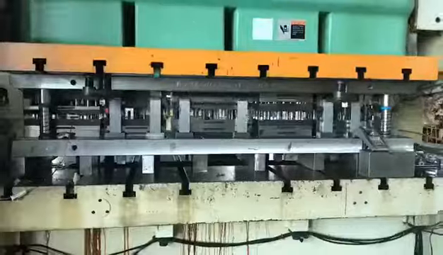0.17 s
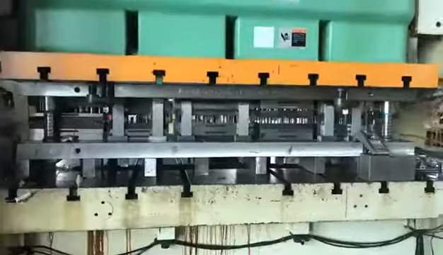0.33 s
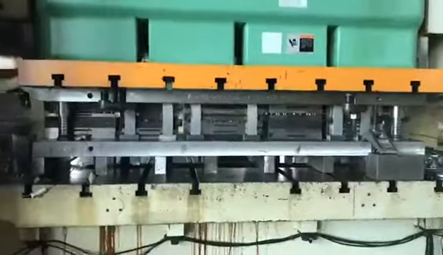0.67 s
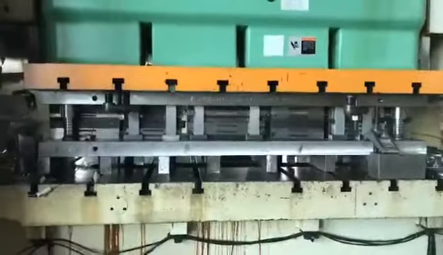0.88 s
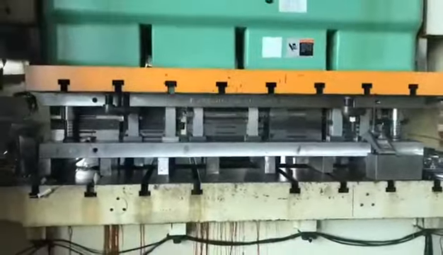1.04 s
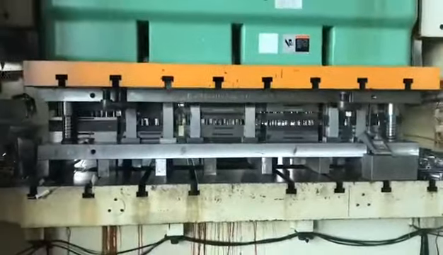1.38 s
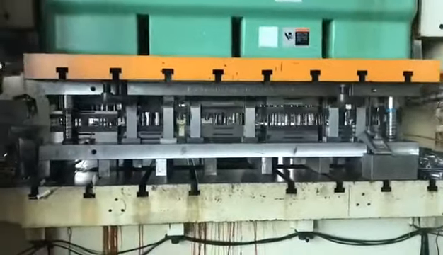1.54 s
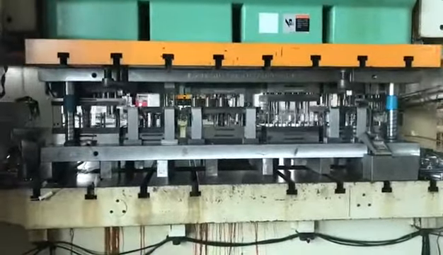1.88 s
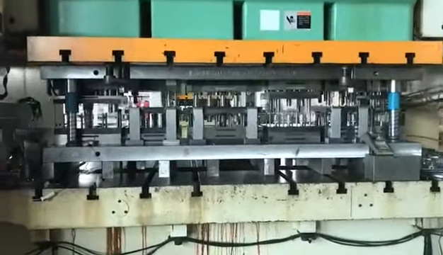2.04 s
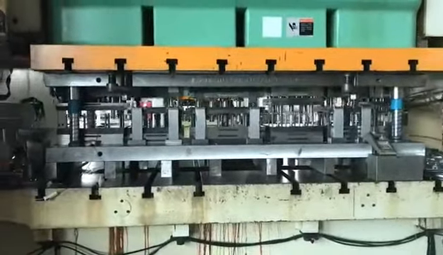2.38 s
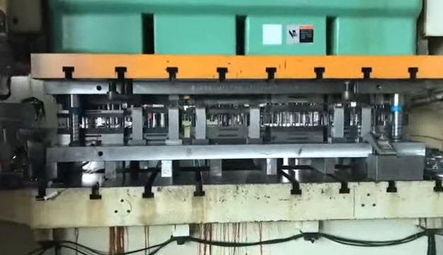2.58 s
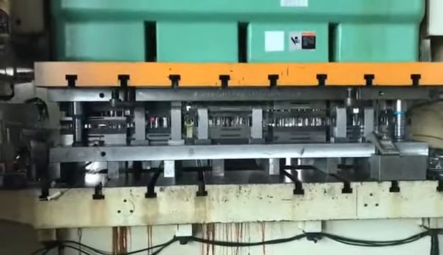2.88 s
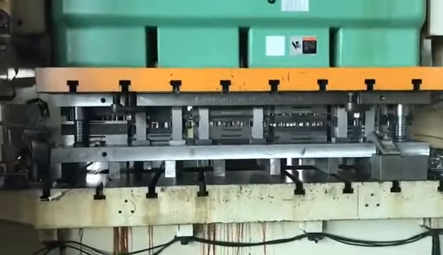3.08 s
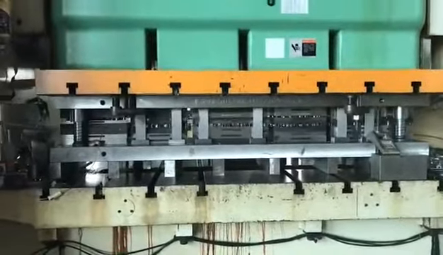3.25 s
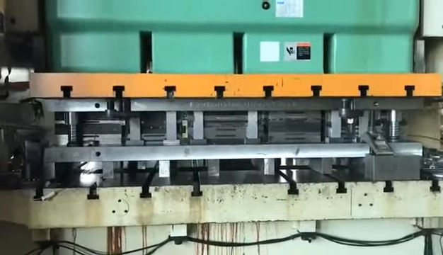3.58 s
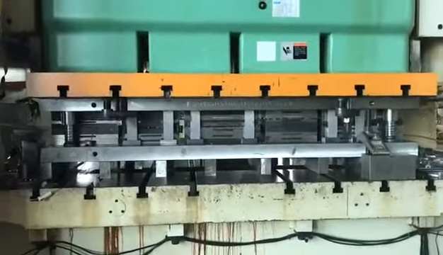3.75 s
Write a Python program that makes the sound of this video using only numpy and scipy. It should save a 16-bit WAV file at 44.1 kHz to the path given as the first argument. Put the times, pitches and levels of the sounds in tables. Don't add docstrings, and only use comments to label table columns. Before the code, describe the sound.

Large stamping press thumps heavily in a factory, with metallic clanks and short air hisses

```python
import sys
import numpy as np
from scipy import signal
from scipy.io import wavfile
from scipy.ndimage import uniform_filter1d

SR = 44100
rng = np.random.default_rng(int(sys.argv[2]) if len(sys.argv) > 2 else 0)


def put_to_file(sound):
    columns = np.atleast_2d(sound).T
    safe = np.clip(columns, -1, 1)
    whole_steps = np.round(safe * 32767)
    wavfile.write(sys.argv[1], SR, whole_steps.astype(np.int16))


def voltage_ratio(decibels):
    exponent = np.asarray(decibels, float) / 20
    return 10 ** exponent


N = 172872
T = np.arange(N) / SR
CYCLE_S = 2.682


def evened(x):
    return x / np.sqrt(np.mean(x ** 2) + 1e-20)


def curve(rows):
    return np.interp(T, *np.transpose(rows))


def wobble(size):
    return evened(uniform_filter1d(uniform_filter1d(rng.standard_normal(N), size), size))


def gate(start, hold, rise_s, t60):
    rise = np.clip((T - start) / rise_s, 0, 1)
    return rise * voltage_ratio(-60 * np.maximum(T - start - hold, 0) / t60)


def add(mix, s, sound):
    part = mix[round(s * SR):][:len(sound)]
    part += sound[:len(part)]


def resonate(x, hz, width_hz):
    turn = np.exp(2j * np.pi * np.cumsum(hz * np.ones(len(x))) / SR)
    r = np.exp(-np.pi * width_hz / SR)
    return 2 * (turn * signal.lfilter([1 - r], [1, -r], x / turn)).real


def bands(modes, wander):
    total = np.zeros(N)
    for hz, width_hz, db in modes:
        centre = hz * (1 + wander * wobble(size=6000))
        narrow = resonate(rng.standard_normal(N), centre, width_hz)
        total += voltage_ratio(db) * evened(resonate(narrow, centre, 3.76 * width_hz))
    return evened(total)


def noise(spectrum, patchy_db, flicker_db):
    frames, hz = N // 256 + 5, np.fft.rfftfreq(1024, 1 / SR)
    a, b, patches = rng.standard_normal((frames, 513, 3)).T
    patches = evened(uniform_filter1d(uniform_filter1d(patches, size=8, axis=0), size=10, axis=1))
    flicker = evened(uniform_filter1d(rng.standard_normal(frames), size=6))
    f, level = np.transpose(spectrum)
    shape = np.interp(np.log(np.minimum(hz, 7400) + 1), np.log(f), level, left=-60)[:, None]
    z = (a + 1j * b) * voltage_ratio(shape + patchy_db * patches + flicker_db * flicker)
    return evened(signal.istft(z, nperseg=1024, noverlap=768)[1][:N])


def ring(modes, rise_s):
    t = np.arange(SR // 2) / SR
    decay = sum(voltage_ratio(db - 60 * t / t60) * np.sin(2 * np.pi * hz * t) for hz, db, t60 in modes)
    return (1 - np.exp(-t / rise_s)) * decay


def crushed_ring(modes, crush_s, rise_s, first, splash_db, splash_hz):
    t = np.arange(1500) / SR
    crunch = rng.standard_normal(1500) * (rng.random(1500) < .1) * np.exp(-t / crush_s)
    crunch[0] = first * np.linalg.norm(crunch)
    clean = np.array([(-1) ** k * ring([mode], rise_s)[:SR // 5] for k, mode in enumerate(modes)])
    rough = signal.fftconvolve(clean, crunch[None], axes=1)
    sound = np.linalg.norm(clean, axis=1) / np.linalg.norm(rough, axis=1) @ rough
    splash = resonate(rng.standard_normal(1500), splash_hz, 1.2 * splash_hz)
    splash = resonate(splash, splash_hz, 1.2 * splash_hz)
    sound[:1500] += voltage_ratio(splash_db) * evened(splash) * np.exp(-t / (2 * crush_s)) * np.minimum(t / 0.0063, 1)
    return np.pad(sound, (0, SR))[:SR // 2]


def knock(hz, t60):
    return ring([(hz, 0, t60), (hz * 1.07, -8, t60)], rise_s=min(1.4 / hz, .004))


def die_blows():
    # (time [s], level [dB], die level [dB], crush time [s])
    blows = [
        (.572, -22, -3, 0.0058),
        (.899, -12, -1.5, 0.009),
        (.917, -20, 4, .01),
        (0.939, -18.5, -10, .006),
    ]
    # (frequency [Hz], level [dB], t60 [s])
    frame_modes = [(97.7, 3.5, 0.15), (109, -4.5, 0.19), (154, -6, 0.16), (79.5, -14, 0.39)]
    # (frequency [Hz], level [dB], t60 [s])
    die_modes = [(288.3, -12.5, 0.24), (342.4, -12, 0.15), (412, -12.5, 0.14), (485, -8, 0.12),
                 (614, -13.5, 0.075), (708.3, -3.5, 0.097), (833, -7.5, 0.065), (950, -5.5, 0.053),
                 (1126, -8, 0.05), (1312, -9.5, 0.043), (1550, -19.5, 0.045), (2350, -16, .04),
                 (4400, -8.5, 0.044)]
    out = np.zeros(N)
    for s, db, bright_db, crush_s in blows:
        for turn in (0, CYCLE_S):
            die = crushed_ring(die_modes, crush_s, rise_s=.0022, first=0.26, splash_db=-12.5, splash_hz=655)
            add(out, s + turn, voltage_ratio(db) * (ring(frame_modes, rise_s=.007) + voltage_ratio(bright_db) * die))
    return out


def bed_thuds():
    # (time [s], level [dB], frequency [Hz], t60 [s])
    thuds = [
        (0.875, -18.5, 136, 0.16),
        (0.955, -21, 119.5, 0.2),
        (0.986, -22.5, 175.4, 0.21),
        (1.004, -17, 130, 0.073),
        (1.03, -26, 105, 0.15),
    ]
    out = np.zeros(N)
    for s, db, hz, t60 in thuds:
        for turn in (0, CYCLE_S):
            add(out, s + turn, voltage_ratio(db) * knock(hz, t60))
    return out


def feeder_clanks():
    # (time [s], level [dB], low-mode level [dB], crush time [s])
    clanks = [
        (1.64, -16, -1, 0.005),
        (1.646, -22, 7.5, 0.0053),
        (1.699, -26.5, 1, 0.016),
        (1.72, -33, 0.5, 0.0063),
        (1.684, -33.5, 4, .008),
    ]
    # (frequency [Hz], level [dB], t60 [s])
    feeder_modes = [(356, -0.5, 0.072), (468, -10.5, 0.043), (562, -5, 0.057), (679, -2.5, 0.034),
                    (900, 0, 0.048), (1140, -7, 0.047), (1380, -11.5, 0.035), (1621, -2, .06),
                    (1940, -7.5, 0.033), (2272, 2.5, .04), (2470, -6.5, 0.12), (2550, 4, 0.052),
                    (2750, -9.5, .03), (3205, -7, 0.051)]
    out = np.zeros(N)
    for s, db, low_db, crush_s in clanks:
        modes = [(hz, d + low_db * (hz < 1000), t60) for hz, d, t60 in feeder_modes]
        clank = crushed_ring(modes, crush_s, rise_s=.001, first=0.83, splash_db=-5.5, splash_hz=1500)
        add(out, s, voltage_ratio(db) * clank)
    return out


def small_knocks():
    # (time [s], level [dB], frequency [Hz], t60 [s])
    knocks = [(.215, -27.5, 346.4, 0.36), (0.386, -34, 95.6, 0.29), (1.268, -19, 327, 0.12),
              (1.345, -22.5, 728, 0.064), (1.378, -23, 264, 0.19), (1.38, -23, 655, 0.053),
              (1.587, -16, 4120, 0.025), (1.59, -20, 6200, .02), (1.591, -26.5, 950, 0.032),
              (1.64, -22, 5930, 0.023), (1.642, -24, 4000, .02), (.166, -23, 2664, 0.1),
              (.168, -25.5, 1053, 0.066), (.171, -26.5, 1500, 0.053), (.18, -26, 171, 0.38),
              (1.643, -20, 555, .1), (1.642, -19.5, 640, .05), (1.644, -23, 3280, .06),
              (3.582, -24, 4400, .03), (3.583, -25.5, 2350, .04), (3.581, -28, 6000, 0.029),
              (1.724, -29, 2430, .15), (2.732, -30, 4200, .06), (2.819, -25, 2750, .08),
              (2.867, -26, 2400, 0.12), (1.699, -19, 1940, 0.044), (1.7, -25.5, 1384, 0.09),
              (2.5, -27.5, 297, 0.23), (2.571, -29, 243, 0.25), (2.766, -25, 267.6, 0.29),
              (3.058, -23.5, 330.5, 0.14), (2.009, -31, 2400, 0.3), (3.782, -27.5, 100, 0.67)]
    out = np.zeros(N)
    for s, db, hz, t60 in knocks:
        add(out, s, voltage_ratio(db) * knock(hz, t60))
    return out


def squeak():
    start_s, length_s, hz = 1.6, 0.042, 6960
    swell = gate(start_s, 0.011, 0.006, 0.25) * np.clip((start_s + length_s - T) / .004, 0, 1)
    tone = np.sin(2 * np.pi * hz * T + .4 * wobble(size=150))
    return voltage_ratio(-22.5 + 1.7 * wobble(size=100)) * swell * tone


def valve_vents():
    # (start [s], hold [s], level [dB], release t60 [s], jet level [dB])
    vents = [
        (0.082, 0.078, -21, 0.54, -2),
        (1.374, 0.062, -22, 0.28, -1),
        (2.769, 0.086, -21, 0.14, -1.5),
        (2.1, 0.015, -28, 0.11, -6.5),
        (0.41, 0.0057, -31, 0.12, -6),
        (3.58, 0.0078, -21.5, 0.067, -4),
        (0.53, .004, -32.5, 0.12, -5),
        (2.725, 0.018, -27, 0.18, -5.5),
        (1.586, .004, -30, .15, 0.5),
        (1.1, .005, -28, 0.14, -6),
    ]
    # (frequency [Hz], level per Hz [dB])
    rush_spectrum = [(100, -29.5), (250, -1), (500, -5.5), (1200, -8.5), (2500, -1.5), (4500, -4.5),
                     (7500, -2)]
    # (frequency [Hz], width [Hz], level [dB])
    nozzle = [(6900, 2460, 0), (4260, 900, -6.5)]
    gates = np.array([voltage_ratio(db) * gate(s, hold, .006, t60) for s, hold, db, t60, _ in vents])
    jets = voltage_ratio(np.array([row[-1] for row in vents])) @ gates
    rush = noise(rush_spectrum, patchy_db=1.3, flicker_db=.5)
    return gates.sum(0) * rush + jets * voltage_ratio(1.5 * wobble(size=120)) * bands(nozzle, wander=0.12)


def strip_rattle():
    # (start [s], length [s], level [dB])
    rattles = [
        (0.11, 0.064, -26),
        (2.818, 0.084, -27.5),
        (2, 0.076, -39),
        (0.23, 0.0027, -33.5),
        (.232, 0.0032, -38),
        (1.435, 0.05, -38.5),
        (1.7, 0.03, -33.5),
    ]
    # (frequency [Hz], width [Hz], level [dB])
    strip_modes = [(237, 130, -5.5), (620, 40, -10), (1005, 76, -3.5), (1430, 80, -4), (1810, 29, -17),
                   (2160, 53, -18), (2400, 180, 2), (2660, 23, -3.5), (3870, 95, -8)]
    taps = (rng.random(N) < 4000 / SR) * rng.standard_normal(N)
    strip = evened(sum(voltage_ratio(db) * evened(resonate(taps, hz, w + 30)) for hz, w, db in strip_modes))
    return sum(voltage_ratio(db) * gate(s, hold, 0.0036, .07) for s, hold, db in rattles) * strip


def hall_echo(x):
    t = np.arange(SR) / SR
    tail = signal.lfilter([1], [1, -.6], rng.standard_normal(SR)) * voltage_ratio(-60 * t / 0.6) * (t > .015)
    return signal.fftconvolve(x, tail / np.linalg.norm(tail))[:N]


def glides(rows, width_hz):
    out = np.zeros(N)
    for s, length, db, from_hz, to_hz in rows:
        u = np.arange(0, length, 1 / SR) / length
        hz = from_hz + (to_hz - from_hz) * u
        fuzz = resonate(resonate(rng.standard_normal(len(u)), hz, width_hz), hz, 2 * width_hz)
        add(out, s, voltage_ratio(db) * evened(fuzz) * np.sin(np.pi * u) ** .5)
    return out


def bush_whistles():
    # (start [s], length [s], level [dB], from [Hz], to [Hz])
    whistles = [
        (.34, 0.32, -34.5, 3900, 4420),
        (3.02, 0.25, -36.5, 4370, 3900),
        (1.96, 0.29, -38, 4000, 3560),
        (1.2, 0.068, -43, 2200, 3400),
    ]
    # (start [s], length [s], level [dB], from [Hz], to [Hz])
    whines = [
        (1.98, .65, -39, 2490, 2560),
        (2.0, 0.36, -43, 4000, 3500),
        (1.59, .06, -39.5, 6300, 4300),
    ]
    return glides(whistles, width_hz=380) + glides(whines, width_hz=150)


def slide_hiss():
    # (time [s], level [dB])
    speed = [(.17, -36.5), (.32, -34.5), (.62, -34), (.95, -37.5), (1.33, -39), (1.5, -34), (1.75, -36),
             (2.05, -34), (2.6, -33), (2.7, -34.5), (3.0, -37), (3.28, -34.5), (3.5, -38.5), (3.92, -38)]
    # (frequency [Hz], width [Hz], level [dB])
    guides = [(2510, 260, -10), (4230, 690, -5.5), (6720, 2140, -3)]
    return voltage_ratio(curve(speed) + 2.5 + 1.8 * wobble(size=500)) * bands(guides, wander=0.02)


def gear_rumble():
    # (time [s], level [dB])
    load = [(.17, -36), (.25, -31.5), (.42, -31), (.55, -35), (.82, -32.5), (1.08, -33), (1.35, -30.5),
            (1.6, -35), (1.8, -35), (1.95, -37.5), (2.1, -42), (2.45, -42.5), (2.6, -32.5), (2.72, -34),
            (3.05, -34.5), (3.15, -35.5), (3.5, -33), (3.92, -36)]
    # (frequency [Hz], width [Hz], level [dB])
    gears = [(160.8, 31, 0.5), (260.4, 62, -1), (343.6, 81, -1.5), (100, 14, -4), (1292, 39, -8),
             (790, 530, -4.5)]
    return voltage_ratio(curve(load) - 2.0 + 1.38 * wobble(size=600)) * bands(gears, wander=0.023)


def motor_throb():
    # (time [s], level [dB])
    throb = [(0.2, -37), (0.32, -48), (0.4, -34), (1.69, -41), (1.81, -33), (2.01, -42), (2.06, -29.5),
             (2.17, -48), (2.28, -34), (2.84, -36.5), (2.87, -48), (3.02, -34), (3.2, -39), (3.62, -31),
             (3.81, -43), (3.83, -34), (3.9, -38), (3.92, -51)]
    motor_hz = 49.3
    hum = bands([(motor_hz, 10, 0), (.78 * motor_hz, 10, -6)], wander=0.014)
    return voltage_ratio(curve(throb) - 0.5 + 0.81 * wobble(size=2500)) * hum


def hall_noise():
    # (frequency [Hz], level per Hz [dB])
    spectrum = [(12, -34), (20, -6.5), (95, -8.5), (291, -12), (330, -17.5), (392, -18), (825, -19),
                (2580, -16), (7500, -19), (9750, -58), (16500, -120)]
    return voltage_ratio(-29) * noise(spectrum, patchy_db=2.5, flicker_db=0.67)


def scene():
    hits = die_blows() + bed_thuds() + feeder_clanks() + small_knocks() + squeak()
    near = hits + valve_vents() + strip_rattle()
    running = slide_hiss() + gear_rumble() + motor_throb() + hall_noise()
    mono = near + voltage_ratio(-15) * hall_echo(near) + bush_whistles() + running
    return np.array([mono, mono])


def thin_treble(x):
    hz, _, z = signal.stft(x, SR, nperseg=2048)
    power = uniform_filter1d(abs(z) ** 2, size=5, axis=0)
    weak = power < voltage_ratio(2 * -6) * uniform_filter1d(power, size=50, axis=0)
    gain = np.where(weak & (hz[:, None] > 2900), voltage_ratio(-10), 1)
    return signal.istft(z * gain, SR, nperseg=2048)[1][:N]


def side_noise():
    # (time [s], low edge [Hz], high edge [Hz], level [dB])
    fills = [
        (.443, 4080, 5300, -35),
        (0.444, 5630, 7000, -39),
        (.815, 5600, 7000, -38),
        (3.833, 5600, 7000, -38.5),
    ]
    side = np.zeros(N)
    for s, low_hz, high_hz, db in fills:
        band_filter = signal.firwin(801, [low_hz, high_hz], pass_zero=False, fs=SR)
        band = signal.oaconvolve(rng.standard_normal(4096), band_filter, "same")
        burst = evened(band)[1024:3072] * signal.windows.tukey(2048, .9) ** 2
        add(side, s - 1024 / SR, voltage_ratio(db) * burst)
    return side


def low_pass(x):
    return signal.sosfilt(signal.butter(12, 8910, fs=SR, output="sos"), x)


def record(dry):
    knee = .55
    cut = thin_treble(knee * np.tanh(dry[0] / knee))
    cut = cut * np.clip((T - .1661) / .0004, 0, 1)
    edge = signal.firwin(1801, 7620, window=("kaiser", 10), fs=SR)
    mid = signal.oaconvolve(cut, edge, "same")
    side = side_noise()
    return low_pass(np.array([mid + side, mid - side]))


dry = scene()
out = record(dry)
put_to_file(out)
```